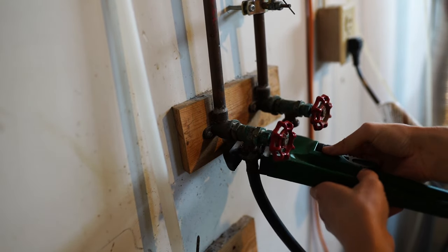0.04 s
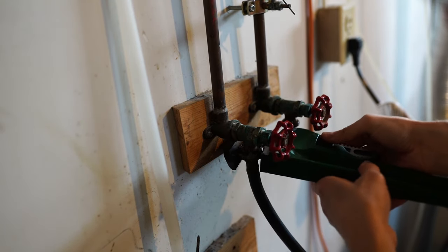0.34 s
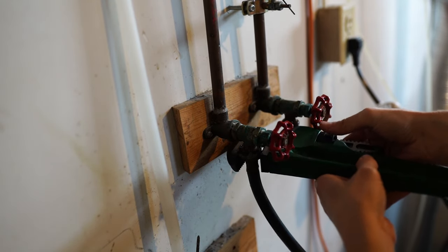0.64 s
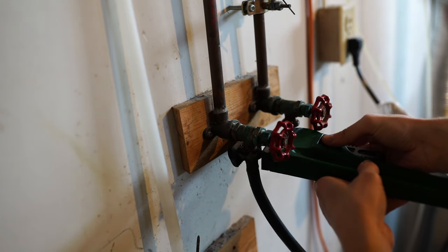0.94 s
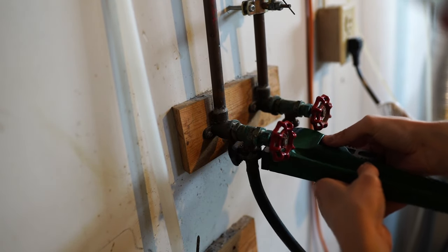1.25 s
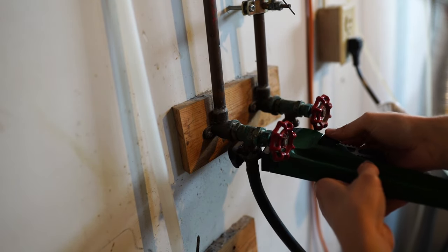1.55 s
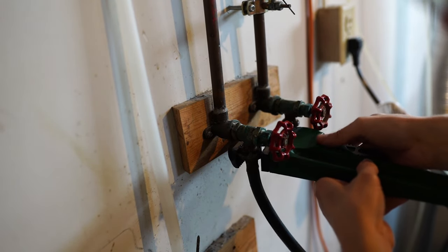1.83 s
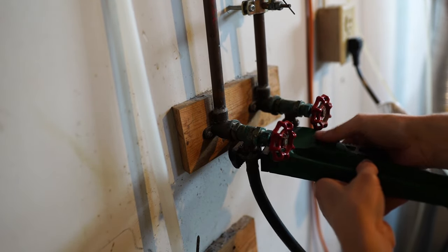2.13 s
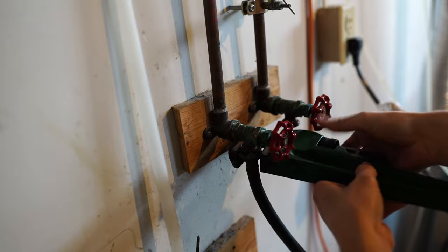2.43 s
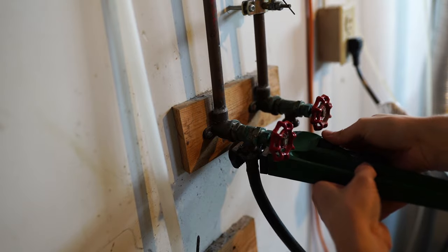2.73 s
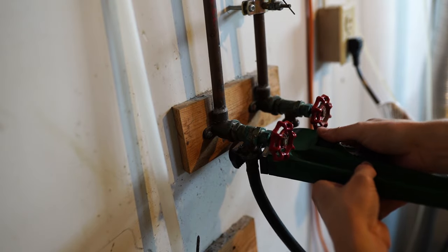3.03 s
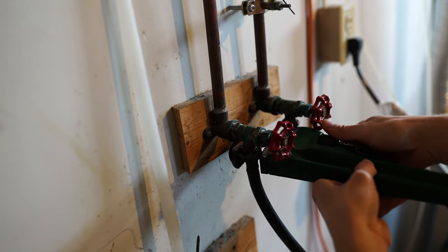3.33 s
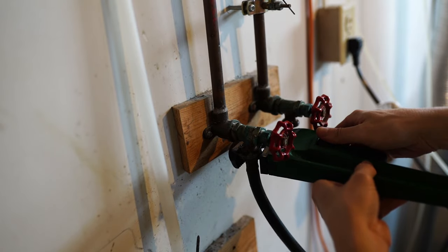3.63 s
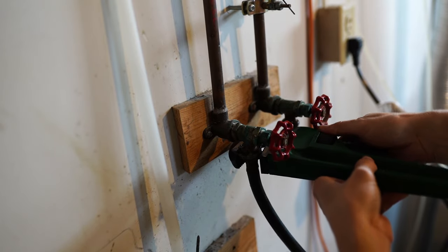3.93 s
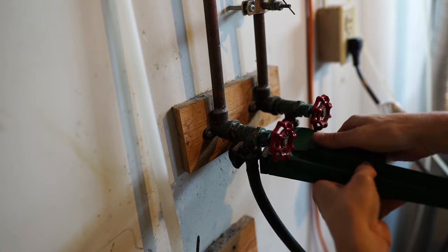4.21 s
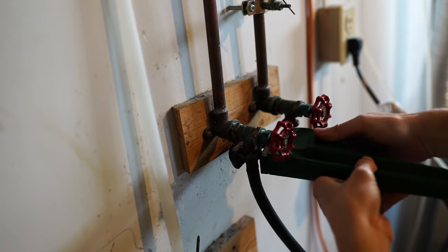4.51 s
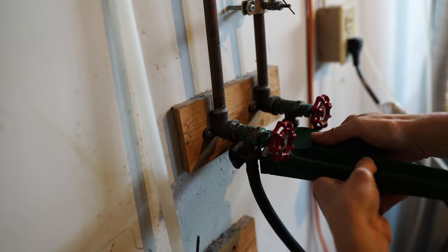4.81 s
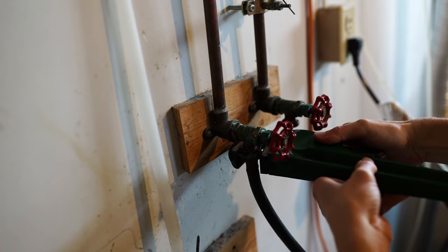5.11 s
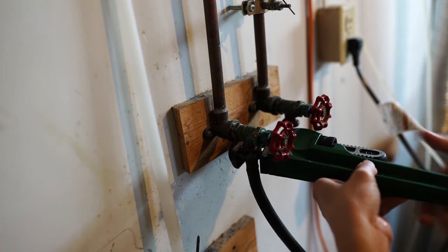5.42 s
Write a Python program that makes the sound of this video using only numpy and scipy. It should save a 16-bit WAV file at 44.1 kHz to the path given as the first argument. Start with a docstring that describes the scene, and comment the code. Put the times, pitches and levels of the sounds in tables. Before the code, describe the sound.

Sharp steel clinks, woody knocks and dull pipe thumps as a wrench tugs at a corroded water valve fitting, then tapers off.

```python
"""A heavy pipe wrench is fitted to a corroded hose connector and tugged, in a small hard-walled room.
The pipes shudder as the hands load them; the valve knocks on its wooden board, the pipes thump in the
wall, and the loose steel jaw clinks and grates on the rust. The brightest clinks come around two seconds.
After a lull near three seconds a fresh tug thumps the wall at four, then a few knocks and faint scrapes
trail off."""
import sys
import numpy as np
from scipy import signal
from scipy.fft import rfft, irfft
from scipy.io import wavfile

SR = 44100
rng = np.random.default_rng(int(sys.argv[2]) if len(sys.argv) > 2 else 0)


def waveform_to_disk(signal):
    """Save audio, clipped to [-1, 1], as 16-bit WAV at the path in sys.argv[1]."""
    frames = np.transpose(np.atleast_2d(signal))
    scaled = np.clip(frames, -1, 1) * 32767
    samples = np.round(scaled).astype(np.int16)
    wavfile.write(sys.argv[1], SR, samples)


N = 240816
TIME = np.arange(N) / SR
BAND_CENTRES_HZ = 26 * 2 ** (np.arange(19) / 2)

# the valve knocks on its board: (time [s], relative level [dB], contact [0 soft to 1 hard])
VALVE_KNOCKS = [(0.038, -20, 0.41), (0.079, -16.5, 0.35), (0.129, -24, 0.65), (0.159, -30.5, 0.87),
                (0.273, -30.5, 0.28), (0.349, -24.5, .3), (0.435, -24.5, .5), (0.602, -26, 0.51),
                (0.663, -19, 0.16), (0.828, -26.5, 0.31), (0.87, -27.5, 0.13), (1.1033, -18, 0.54),
                (1.389, -34.5, 0.07), (1.866, -29, 0.18), (1.998, -25.5, 1), (2.023, -27.5, 0.81),
                (2.276, -29.5, 0.87), (2.572, -35.5, .4), (2.713, -31.5, 0.61), (2.96, -47, 1),
                (3.136, -33, 0.37), (3.913, -33.5, 0.71), (4.367, -29, 0.89), (4.614, -24, 0.76),
                (4.868, -26, 0.78)]
# wrench and valve steel: (frequency [Hz], relative level [dB], free ring t60 [s])
STEEL_MODES = [(1700, -11, .16), (1785, -7, .16), (1908, -5, .2), (2293, -13, .15), (2790, -8, .12),
               (2864, -1, .25), (3090, -11, .16), (3260, -9, .16), (3494, -6, .32), (3670, -12, .18),
               (4040, -9, .09), (4137, -8, .26), (4208, -7, .5), (4285, -6, .26), (4390, -7, .12),
               (4857, -9, .4), (4885, -10, .16), (5490, -23, .25), (5735, -21, .18), (6130, -16, .28),
               (7399, -10, .26), (7712, -18, .28), (9313, -22, .18), (10850, -3, .06), (10975, 0, .12),
               (11070, -6, .15), (11585, -14, .35), (14280, -4, .14)]


def from_db(db):
    """Decibels to gain."""
    return 10 ** (np.asarray(db) / 20)


def unit_rms(x):
    """Scale to unit rms."""
    return x / np.sqrt(np.mean(x ** 2) + 1e-20)


def at_hz(points, hz):
    """Read a curve of (frequency [Hz], value) on a log-frequency axis."""
    centres, values = np.transpose(points)
    return np.interp(np.log(hz), np.log(centres), values)


def morph(response, hz, share):
    """Crossfade two curves: (frequency [Hz], level at share 0 [dB], level at share 1 [dB])."""
    response, share = np.array(response), np.clip(share, 0, 1)
    return (1 - share) * at_hz(response[:, [0, 1]], hz) + share * at_hz(response[:, [0, 2]], hz)


def bandpass(x, low_hz, high_hz):
    """Roll off the bass and the treble."""
    return signal.sosfilt(signal.butter(2, [low_hz, high_hz], "band", fs=SR, output="sos"), x)


def half_octave(x, hz):
    """The half octave around hz."""
    return bandpass(x, hz * 2 ** -.25, hz * 2 ** .25)


def coloured(x, spectrum):
    """Shape x with a minimum-phase EQ curve, at unit rms."""
    hz = np.linspace(1, SR / 2, 2049)
    cepstrum = irfft(np.log(from_db(at_hz(spectrum, hz))))
    cepstrum[1:len(hz) - 1] *= 2
    cepstrum[len(hz):] = 0
    impulse_response = irfft(np.exp(rfft(cepstrum)))
    return unit_rms(signal.oaconvolve(x, impulse_response)[:N])


def clicks(times, sizes):
    """One impulse for each contact."""
    return np.bincount(np.clip(np.round(times * SR).astype(int), 0, N - 1), sizes, N)


def ring(force, hz, t60):
    """One mode: a unit click starts a decaying sine of height 1."""
    radius, angle = from_db(-60 / (t60 * SR)), 2 * np.pi * hz / SR
    return signal.lfilter([0, np.sin(angle)], [1, -2 * radius * np.cos(angle), radius ** 2], force + 1e-18)


def strike(times, level_db, modes, scatter_db, detune, ring_share=1, mode_ratio=-1):
    """Each blow excites every mode a little differently; the changing grip detunes and damps them."""
    hz, db, t60 = np.transpose(modes)
    luck = rng.standard_normal((len(times), 2, len(hz)))
    sizes = from_db(np.transpose([level_db(f) for f in hz]) + db + scatter_db * luck[:, 0])
    sizes *= mode_ratio ** np.arange(len(hz))   # at -1, neighbouring modes start in opposite directions
    pitches = hz * (1 + detune * luck[:, 1])
    shares = np.clip(ring_share * np.ones(len(times)), .1, 2)
    out, click = np.zeros(N + SR), signal.unit_impulse(int(.7 * SR))
    for s, size, pitch, share in zip(times, sizes, pitches, shares):
        blow = sum(a * ring(click, f, t * share) for a, f, t in zip(size, pitch, t60))
        start = max(0, round(s * SR))
        out[start:start + len(blow)] += blow
    return out[:N]


def crack(times, level_db, spectrum, t60):
    """The attack: a crowd of heavily damped modes, heard as a burst of noise that dies at once."""
    energy_decay = from_db(-120 / (t60 * SR))
    out, white = np.zeros(N), rng.standard_normal((2, N))
    for k, hz in enumerate(BAND_CENTRES_HZ[BAND_CENTRES_HZ > spectrum[0][0]]):
        energy = clicks(times, from_db(level_db(hz) + at_hz(spectrum, hz)) ** 2)
        envelope = np.sqrt(signal.lfilter([1], [1, -energy_decay], energy + 1e-18))
        out += half_octave(white[k % 2] * envelope, hz)
    return out


def still_air():
    """A faint, bass-heavy bed of room tone."""
    # room tone colour: (frequency [Hz], relative level [dB])
    air_colour = [(25, -14), (50, -3), (80, -6.5), (128, 4), (200, -10), (300, -17), (400, -18.5),
                  (650, -23), (1500, -34.5), (3300, -34), (5000, -42.5), (15000, -49.5)]
    return from_db(-48.5) * coloured(rng.standard_normal(N), air_colour)


def pull_db(times):
    """The load on the pipes: each pull builds, holds and eases to the resting grip; the strongest wins."""
    # the hands pull on the wrench: (time at full load [s], hold [s], load [dB])
    pulls = [(0.067, 0.15, -21), (0.448, 0.43, -27), (0.853, 0.017, -30), (1.143, 0.062, -28),
             (1.38, 0.098, -30), (1.844, 0.16, -29.5), (2.321, .03, -37.5), (2.72, 0.032, -36.5),
             (3.24, 0.016, -41), (4, 0.018, -26), (4.45, 0.26, -38.5), (5.42, .04, -34.5)]
    build_db_per_s, relax_db_per_s, grip_db = 111, 69, -54.5
    load_db = grip_db
    for start, hold, db in pulls:
        early, late = np.maximum(start - times, 0), np.maximum(times - start - hold, 0)
        load_db = np.maximum(load_db, db - build_db_per_s * early - relax_db_per_s * late)
    return load_db


def pipe_shudder():
    """The pipes rumble as the hands load them."""
    # rumble colour: (frequency [Hz], relative level [dB])
    shudder_colour = [(25, -48), (40, -23), (55, -1), (85, 1), (135, 10.5), (180, -1.5), (250, -4),
                      (400, -15), (800, -29), (1500, -34), (3500, -36), (8000, -67)]
    return from_db(pull_db(TIME) - 4.5) * coloured(rng.standard_normal(N), shudder_colour)


def board_knocks():
    """The valve takes up its slack against the board: a woody knock with a short crack."""
    # valve body and board: (frequency [Hz], relative level [dB], t60 [s])
    board_modes = [(280.5, -1.5, 0.27), (337, -16.5, 0.17), (416, 0, 0.062), (489.7, -5, 0.12),
                   (585, -5, 0.37), (688, -0.5, 0.22), (776, -10.5, 0.16), (843, 0.5, 0.12), (967, -5, 0.1),
                   (1112, -5, 0.23)]
    # tone by hardness of contact: (frequency [Hz], soft knock [dB], hard knock [dB])
    board_response = [(350, 1.5, -9.5), (780, -0.5, -1), (1155, -18, 7.5), (2350, -38.5, -3)]
    # colour of the wooden attack: (frequency [Hz], relative level [dB])
    crack_colour = [(120, 6), (300, 7.5), (600, 5.5), (950, -4), (1400, -10.5), (2200, -2), (3300, 0),
                    (4600, -13), (7000, -23), (15000, -40)]
    times, db, hardness = np.transpose(VALVE_KNOCKS)
    level_db = lambda hz: db + morph(board_response, hz, hardness)
    body = strike(times, level_db, board_modes, scatter_db=2.5, detune=0.0092, mode_ratio=0.98)
    # a small panel radiates no deep bass, and a yielding contact passes no treble
    body = bandpass(body, low_hz=203, high_hz=1590)
    return from_db(-14.5) * body + from_db(10) * crack(times, level_db, crack_colour, t60=0.039)


def wall_thumps():
    """Jolts travel along the pipes and set the wall booming."""
    # the pipes give under the pull: (time [s], relative level [dB])
    thumps = [(0.056, -15), (0.302, -20), (0.445, -17), (0.589, -14.5), (0.621, -16.5), (0.929, -21),
              (1.074, -14), (1.824, -26.5), (1.932, -19.5), (2.268, -28.5), (2.764, -23.5), (3.943, -29),
              (4.04, -14.5), (4.063, -22), (4.146, -22)]
    # pipe run and wall: (frequency [Hz], relative level [dB], t60 [s])
    wall_modes = [(55, -9, .3), (76, -9, .15), (103, -3, .18), (132, -1, .3), (173, 0, .3), (222, -7, .12),
                  (281, -10, .25)]
    usual_pull_db, clamp_limit_db, settle_s = -32, -13.5, .035
    knock_s, knock_db, _ = np.transpose(VALVE_KNOCKS)
    # knocks jolt the wall too, more under a hard pull, until the pipe clamps limit the travel
    jolt_db = np.minimum(knock_db + 5 + 0.51 * (pull_db(knock_s) - usual_pull_db), clamp_limit_db)
    # just after a thump the pipes have no slack for a knock to take up
    slack = np.array([not any(0 < s - thump_s < settle_s for thump_s, _ in thumps) for s in knock_s])
    times, db = np.hstack([np.transpose(thumps), [knock_s[slack], jolt_db[slack]]])
    boom = strike(times, lambda hz: db, wall_modes, scatter_db=-0.6, detune=0.0074, mode_ratio=0.97)
    return from_db(-7.5) * bandpass(boom, low_hz=62.7, high_hz=380)


def jaw_clinks():
    """Steel on steel: where and how hard the jaw lands decides which modes speak."""
    # the jaw lands: (time [s], relative level [dB], hardness as treble tilt [dB/octave],
    # place [0 heel to 1 tip], ring time [share of the free ring])
    clinks = [(0.0578, -21, 2, 0.11, 0.22), (0.0897, -26, -3.5, 0.5, 0.81), (0.2152, -40.5, -5, 0.7, 0.37),
              (0.2841, -35.5, -4, 0.53, 0.55), (0.381, -20, -2.5, 0.25, 0.16),
              (0.4713, -36.5, 4, 0.93, 0.21), (0.5132, -36.5, -7, 0.36, 0.8), (0.6894, -36, 2, 0, 0.54),
              (0.7054, -28, -5.5, 0.17, 0.83), (0.7214, -30, -6, 0.93, 0.51),
              (0.8802, -43.5, -9.5, 0.14, 0.37), (1.0585, -35, -11.5, 0, 0.23), (1.107, -47, -21, .1, 0.31),
              (1.4457, -28, -0.5, 0.57, 0.71), (1.4617, -31, -6, 0.7, 0.35), (1.648, -55, -17, 0.36, 0.13),
              (1.704, -49, -7.5, 0.6, 0.35), (1.8014, -21, 8.5, 0.97, 0.31), (1.8113, -16, 3, 0.043, 0.34),
              (1.9234, -38.5, 1, 0.96, 0.84), (1.9752, -17, 2, .4, .62), (1.9989, -14, -0.5, 0.52, 0.23),
              (2.2249, -14.5, 14.5, 0.61, 0.62), (2.6174, -48.5, 5.5, 0.54, 0.35),
              (2.6644, -52.5, 10, .6, .4), (5.138, -46.5, 3.5, 0.076, 0.16)]
    # tone by place of the blow: (frequency [Hz], at the heel [dB], at the tip [dB])
    jaw_response = [(2000, -8.5, -7), (2750, -15, -5), (3700, -10, -7.5), (4000, -2, -17),
                    (4200, -0.5, -15), (4850, -28.5, 1.5), (7000, -32.5, -17), (10850, -20.5, -22.5),
                    (11400, -23.5, -36.5), (14300, -24, -36.5)]
    # colour of the steel attack: (frequency [Hz], relative level [dB])
    crack_colour = [(700, 7.5), (1300, -5.5), (2000, -7.5), (2700, 8.5), (4400, -5), (6000, -4.5),
                    (8500, -14.5), (10500, -8), (12500, -32), (15000, -30)]
    # points where the attack follows the tone of the blow: (frequency [Hz])
    anchors_hz = [2000, 3200, 4200, 7200, 10900, 14300]
    tilt_pivot_hz, tilt_top_hz = 3900, 9000
    times, db, tilt, place, ring_share = np.transpose(clinks)
    octaves = lambda hz: np.log2(min(hz, tilt_top_hz) / tilt_pivot_hz)
    mode_db = lambda hz: db + morph(jaw_response, hz, place) + tilt * octaves(hz)
    ringing = strike(times, mode_db, STEEL_MODES, scatter_db=2, detune=0.0011, ring_share=ring_share)
    # while the parts still touch, their modes are pulled off pitch and choked
    choked = strike(times, mode_db, STEEL_MODES, scatter_db=2, detune=.018, ring_share=0.13)
    blow_curves = np.transpose([mode_db(hz) for hz in anchors_hz])
    crack_db = lambda hz: np.array([np.interp(np.log(hz), np.log(anchors_hz), row) for row in blow_curves])
    attack = crack(times, crack_db, crack_colour, t60=0.026)
    return from_db(-3) * ringing + from_db(-0.5) * choked + from_db(5) * attack


def rust_scrapes(slips_per_s, spread_db):
    """Tiny uneven slips ring the steel and rub through the board; the hardest ones crackle."""
    # teeth grate on rust: (time [s], length [s], rub [dB], grit over rub [dB], steel ring over rub [dB])
    scrapes = [(0.071, 0.028, -30.5, -23, -18), (0.099, 0.29, -44, -36, -26),
               (0.4, 0.21, -45.5, -23, -21.5), (.669, 0.033, -43.5, -3.5, -27),
               (1.788, 0.086, -40.5, -22, -24), (1.945, 0.092, -37, -36, -12),
               (2.227, 0.12, -40.5, -12, -8), (2.558, 0.18, -53, -32, -24), (2.863, 0.12, -66.5, 0.5, -5),
               (3.67, 0.23, -57.5, -23, -21), (3.884, .18, -41.5, -24, -37),
               (4.953, 0.11, -60.5, -5.5, -31), (5.267, 0.065, -59, 3.5, -7)]
    # bright crackle colour: (frequency [Hz], relative level [dB])
    grit_colour = [(800, -1.5), (2000, -5), (3600, 0), (6000, -14), (10000, -9.5), (15000, -26)]
    # dull rub colour: (frequency [Hz], relative level [dB])
    rub_colour = [(150, -7), (260, 5), (380, -3), (650, 0.5), (1000, -10.5), (1500, -18), (2500, -23.5),
                  (3600, -14), (4300, -33), (6000, -30), (15000, -57.5)]
    progress = np.array([np.clip((TIME - s) / length, 0, 1) for s, length, *_ in scrapes])
    strokes = np.sqrt(np.sin(np.pi * progress).clip(0))
    _, _, rub_db, grit_db, ring_db = np.transpose(scrapes)
    grit_gain, ring_gain, rub_gain = from_db([rub_db + grit_db, rub_db + ring_db, rub_db]) @ strokes
    slips = (rng.random(N) < slips_per_s / SR) * rng.choice([-1, 1], N)
    slips = slips * from_db(spread_db * np.minimum(rng.exponential(1, N), 4))
    ringing = sum((-1) ** k * from_db(db) * ring(slips, hz, t60 * 0.25)
                  for k, (hz, db, t60) in enumerate(STEEL_MODES))
    grit = coloured(slips * np.abs(slips), grit_colour)
    return grit_gain * grit + ring_gain * unit_rms(ringing) + rub_gain * coloured(slips, rub_colour)


def near_wall(x, gain_db, t60):
    """The corner just behind the valve adds a quick scatter of early reflections."""
    delays_s = rng.uniform(0.00093, .03, size=40)
    sizes = from_db(gain_db - 60 * delays_s / t60) * rng.choice([-1, 1], len(delays_s))
    return x + signal.oaconvolve(x, clicks(delays_s, sizes)[:SR // 20])[:N]


def room_echoes(x, predelay_s):
    """Dense reflections from close walls; the treble dies first."""
    # reverb decay: (frequency [Hz], t60 [s])
    room_t60 = [(100, 0.35), (300, 0.52), (1000, 0.33), (4000, 0.3), (8000, 0.14), (15000, 0.077)]
    age, white = TIME[:SR], rng.standard_normal((2, SR))
    tail = sum(half_octave(white[k % 2], hz) * from_db(-60 * age / at_hz(room_t60, hz))
               for k, hz in enumerate(BAND_CENTRES_HZ))
    fade_in = np.clip(age / predelay_s - 1, 0, 1)
    midrange_trim = np.sqrt(2 * np.log(1000) / (at_hz(room_t60, 1400) * SR))   # unit gain in the mids
    return signal.oaconvolve(x, tail * fade_in * midrange_trim)[:N]


def scene():
    """Valve, wall and wrench feed the room reverb, over dry pipe shudder and still air; mono."""
    steel = near_wall(jaw_clinks(), gain_db=-20.5, t60=0.18)
    board = near_wall(board_knocks(), gain_db=-25, t60=0.14)
    wall = wall_thumps()
    rust = rust_scrapes(slips_per_s=1200, spread_db=1.5)
    air = still_air()
    send = from_db(-3) * steel + from_db(-0.5) * board + from_db(-9) * wall + from_db(-3) * rust
    reverb = room_echoes(send, predelay_s=0.0036)
    return (steel + board + wall + rust + reverb + pipe_shudder() + air)[None]


def record(dry):
    """A steep low-pass takes off the top above 16 kHz."""
    return signal.sosfilt(signal.ellip(10, .1, 80, 16000, fs=SR, output="sos"), dry)


dry = scene()
out = record(dry)
waveform_to_disk(out)
```